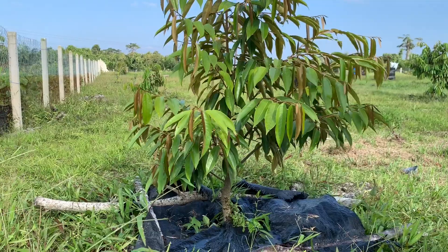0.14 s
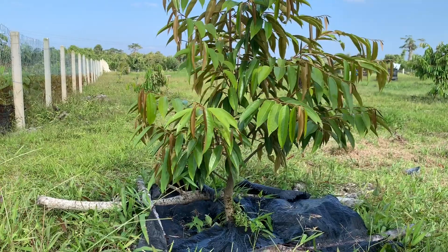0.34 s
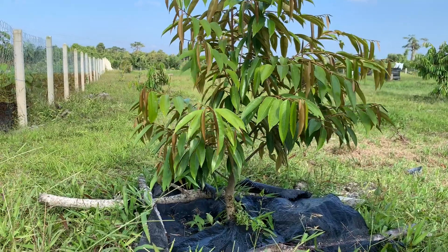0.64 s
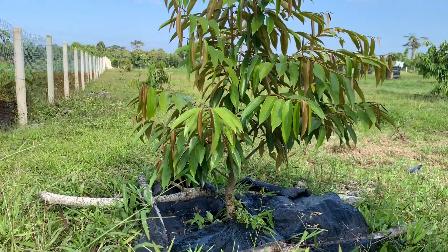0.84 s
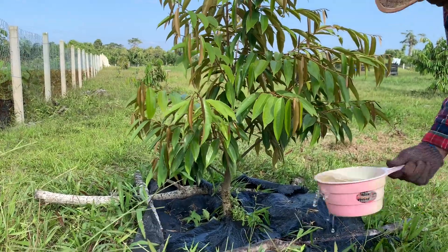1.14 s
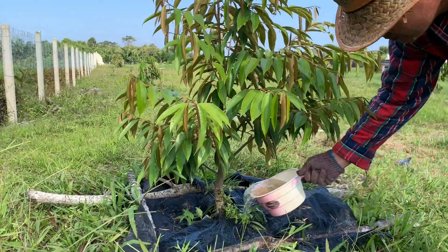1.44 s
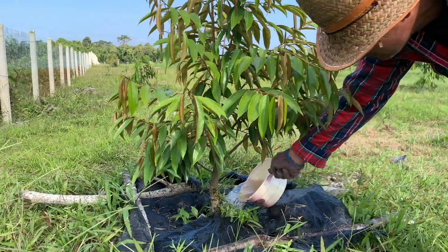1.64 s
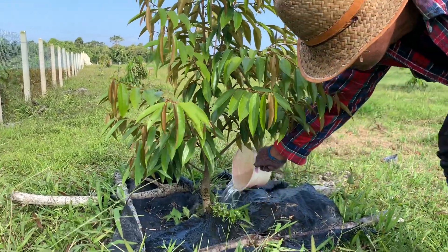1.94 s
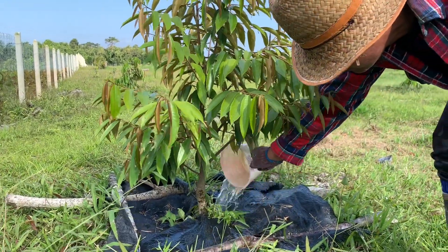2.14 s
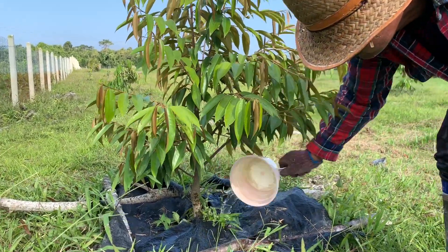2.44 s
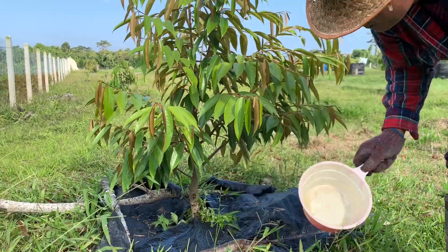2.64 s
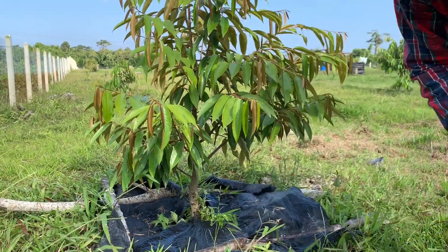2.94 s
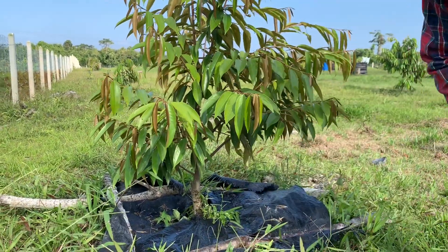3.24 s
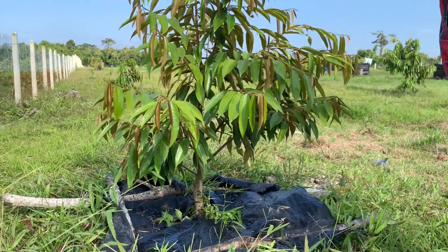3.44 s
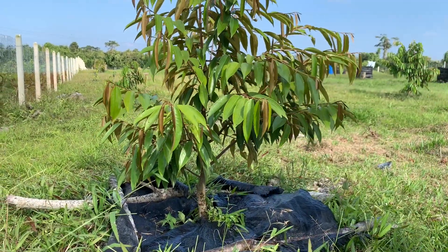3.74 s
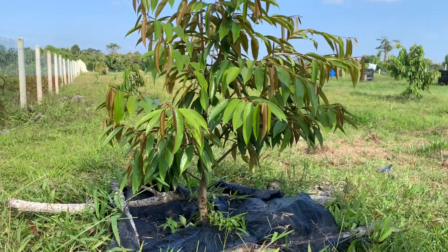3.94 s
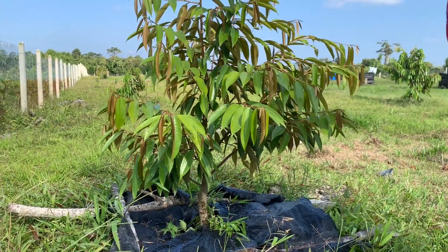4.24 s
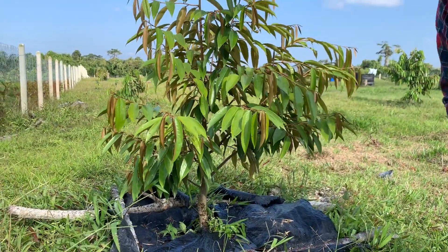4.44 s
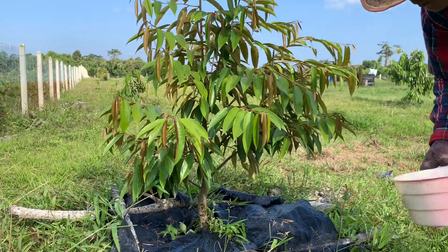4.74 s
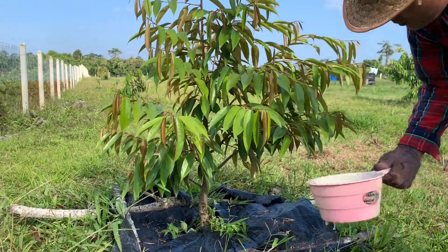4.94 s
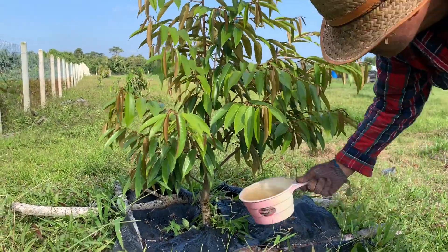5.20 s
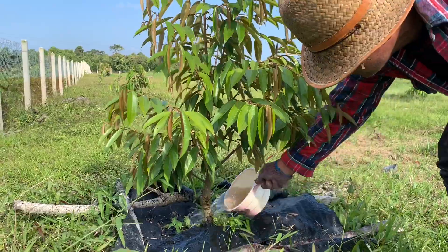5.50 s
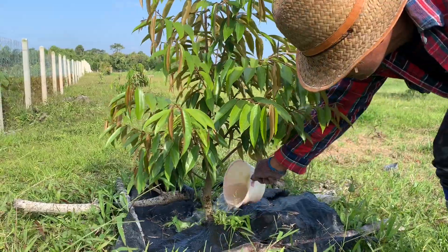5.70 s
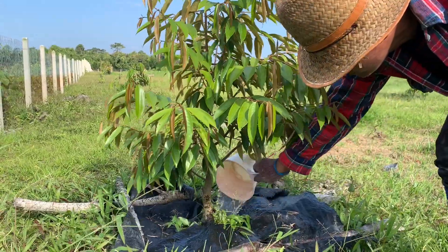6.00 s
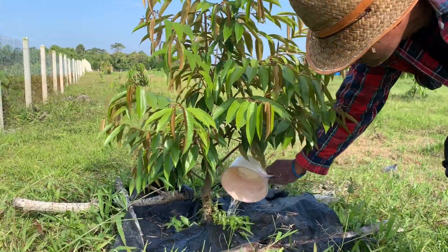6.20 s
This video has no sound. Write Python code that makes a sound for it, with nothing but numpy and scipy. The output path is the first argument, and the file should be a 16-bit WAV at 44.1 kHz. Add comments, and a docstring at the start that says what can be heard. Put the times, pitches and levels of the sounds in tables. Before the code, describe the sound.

In a breezy orchard, water slaps and gurgles hollowly in a bucket to the right as a dipper fills. A brief spill leads to a fizzing pour onto soil and netting close in front, while wind thumps the microphone. The dipper knocks sharply on the bucket, scoops more water with bubbly slosh, then pours a second time, unfinished at the end. Faint insects and leaves lie behind.

```python
"""An orchard in a light breeze: wind buffets the microphone ports, insects hiss and far leaves rustle.
To the right a plastic dipper is filled at a bucket, by coloured noise and short ringing tones; a far bird chirps.
From 1.2 s water spills and is poured in front onto netting and soil, as drop noise and bubbles.
Near 3 s the dipper knocks on the bucket, a sum of damped modes; it is filled again and, from 5.3 s, poured again."""
import sys
import numpy as np
from scipy import signal
from scipy.fft import rfft, irfft, next_fast_len
from scipy.io import wavfile
from scipy.ndimage import uniform_filter1d, map_coordinates

SR = 44100
rng = np.random.default_rng(int(sys.argv[2]) if len(sys.argv) > 2 else 0)


def bounce(signal):
    """Save signal as a 16-bit WAV file at the path given by the first command-line argument."""
    frames = np.transpose(np.atleast_2d(signal))
    limited = np.clip(frames, -1, 1)
    pcm = np.round(limited * 32767).astype(np.int16)
    wavfile.write(sys.argv[1], SR, pcm)


N = 280590
DIRECT = np.array([[1], [0]])  # sound with no scattered part
SIDE = np.array([[1], [-1]])  # left and right signs

# Spectrum of fine water spray. Each row: frequency in Hz, relative density in dB per Hz.
SPRAY = [(5000, 1), (7600, -38), (8200, 6), (10000, 8), (12500, 5.5), (15500, 6.5), (17000, -10)]


def amp(db):
    """Decibels to amplitude: 20 dB is a factor of ten."""
    return 10 ** (np.asarray(db) / 20)


def unit(x):
    """Normalise to a root mean square of 1."""
    return x / np.sqrt(np.mean(x ** 2) + 1e-20)


def along(points, hz):
    """Interpolate the columns of (Hz, value, ..) rows on a logarithmic frequency axis."""
    f, *cols = np.transpose(points)
    return np.squeeze([np.interp(np.log(hz + 1), np.log(f), c) for c in cols])


def gains(spans):
    """Envelopes linear in decibels, one for each level column; silent between the spans."""
    t, total = np.arange(N) / SR, 0
    for rows in spans:
        s, *cols = np.transpose(rows)
        edge = np.clip(np.minimum(t - s[0], s[-1] - t) / 0.016 + 1, 0, 1)  # 16 ms fades outside the span
        total = total + edge * amp([np.interp(t, s, c) for c in cols])
    return total


def wobble(rate):
    """Slow random modulation: a smooth curve through random knots, rate of them a second."""
    knots = rng.standard_normal(int(N * rate / SR) + 4)
    return map_coordinates(knots, [np.arange(N) * rate / SR])


def filtered(x, response):
    """Linear filtering: the spectrum of x times a complex response of frequency."""
    m = next_fast_len(N + 8192)
    return irfft(rfft(x, m) * response(np.fft.rfftfreq(m, 1 / SR)), m)[..., :N]


def rumble(spectrum):
    """Stationary coloured noise: two unrelated channels of rms 1."""
    def colour(hz):
        return amp(along(spectrum, hz) - 80 * (hz < spectrum[0][0]))
    return unit(filtered(rng.standard_normal((2, N)), colour))


def noise(spectrum, patchy_db):
    """Non-stationary coloured noise: two unrelated channels of rms 1 share patches of random gain."""
    hz, shape = np.fft.rfftfreq(512, 1 / SR), (257, N // 256 + 3)
    z = rng.standard_normal((2, *shape)) + 1j * rng.standard_normal((2, *shape))
    patches = uniform_filter1d(rng.standard_normal(shape), size=6, axis=0)
    patches = unit(uniform_filter1d(patches, size=2, axis=1))
    colour = along(spectrum, hz) - 80 * (hz < spectrum[0][0])
    cells = z * amp(colour[:, None] + patchy_db * patches)
    return unit(signal.istft(cells, nperseg=512)[1][:, :N])


def spatter(rate, spread_db, t60, smooth):
    """Shot-noise envelope: droplets land at random, few large and many small, over a smooth sheet."""
    sizes = amp(spread_db * np.minimum(rng.exponential(size=N), 3))
    hits = (rng.random(N) < rate / SR) * sizes
    swell = uniform_filter1d(hits, size=SR // 500)  # a droplet takes about 2 ms to spread
    decay = signal.lfilter([1], [1, -amp(-60 / SR / t60)], swell)
    return unit(smooth + unit(decay))


def bubbles(rate, low_hz, high_hz, cycles, spread_db, size, rise=0.02):
    """Resonance of air bubbles: soft-starting damped sines whose pitch rises a little."""
    draw = rng.random((int(rate * N / SR), 3))
    hz = low_hz * (high_hz / low_hz) ** draw[:, 1:2]
    k = np.arange(size)
    u = k / SR * hz / cycles
    strength = amp(-spread_db * np.log(draw[:, 2:] + 0.055))
    tone = np.sin(2 * np.pi * cycles * (u + rise * u * u))
    wave = strength * (1 - np.exp(-12 * u)) * np.exp(-4 * u) * tone
    at = (draw[:, :1] * N).astype(int) + k
    return unit(np.bincount(at.ravel(), wave.ravel(), N + size)[:N]) * DIRECT


def ticks():
    """Impulsive bursting of droplets: a few cycles each, scattered over the treble."""
    return 0.3 * bubbles(260, 2500, 14000, cycles=5, spread_db=7, size=90, rise=.1)


def bursts(events, t60, bright, body):
    """Impact noise: broad hiss over a lower body swells for a few ms to about the listed time, then decays."""
    top, low, t = np.zeros(N + SR), np.zeros(N + SR), np.arange(SR // 8) / SR
    shape = amp(-60 * t / t60) * (1 - np.exp(-t / .0016)) ** 2
    shape = shape / shape.max()
    for s, db, body_db in events:
        at = round((s - .002) * SR)
        top[at:][:len(t)] += amp(db - 9) * shape
        low[at:][:len(t)] += amp(body_db + db - 9) * shape
    return .5 * top[:N] * bright + .6 * low[:N] * body


def glides(rows, attack):
    """Frequency modulation: short tones swell, glide in pitch and fade; an early swell also glides early."""
    x = np.zeros(N)
    for s, db, first_hz, last_hz, length in rows:
        u = np.linspace(0, 1, round(length * SR)) ** attack
        phase = 2 * np.pi * np.cumsum(first_hz + (last_hz - first_hz) * u) / SR
        x[round(s * SR):][:len(u)] += amp(db) * np.sin(np.pi * u) * np.sin(phase)
    return x


def placed(x, where):
    """Interaural-style cues: direct and scattered rows reach two ports with set likeness, lag and level."""
    def turn(hz):
        return np.arccos(np.clip(along(where, hz)[1], 0, 1)) / 2

    def split(hz):
        return np.array([np.cos(turn(hz)), np.sin(turn(hz))])

    def ports(hz):
        lag, _, db = along(where, hz)
        return amp(SIDE * db / 2) * np.exp(-.5j * SIDE * lag)
    direct, scattered = filtered(x, split)
    return filtered(direct + SIDE * scattered, ports)  # the scattered part makes the ports less alike


def field():
    """Ambient noise: far leaves, a low rustle that comes and goes, and amplitude-modulated insects."""
    # Far leaves. Each row: frequency in Hz, relative density in dB per Hz.
    leaves = [(150, -83), (350, -95), (700, -100), (1400, -104), (2300, -109), (3400, -107), (5500, -112),
              (6600, -112), (7100, -105), (7600, -112), (9500, -113), (10300, -110), (11000, -115),
              (16000, -115)]
    # Band of the insects. Each row: frequency in Hz, relative density in dB per Hz.
    chorus = [(5900, -30), (6500, -7), (6850, 0), (7250, 0), (7600, -8), (8100, -40)]
    # Insects before their tremble. Each row: time in seconds, level in dB.
    insect_levels = [(0, -82), (1.2, -72.5), (2.7, -106), (3.5, -123), (5, -79), (6.36, -84)]
    # Low rustle before its wavering. Each row: time in seconds, level in dB.
    murmur_levels = [(0, -83), (1, -75), (2.5, -71.5), (3.3, -118), (4.7, -70), (5.3, -68), (6.36, -66)]
    tremble_db, pulses_per_s = 3.5, 65
    pulse = np.sin(2 * np.pi * pulses_per_s * np.arange(N) / SR + 2 * wobble(4))
    tremble = amp(tremble_db * (pulse + 0.61 * wobble(15)))
    insects = gains([insect_levels])[0] * tremble * rumble(chorus + [(8300, -120)])
    low_rustle = rumble([(200, -7.5), (400, -7.5), (700, -8), (1100, -19), (1600, -53)])
    murmur = gains([murmur_levels])[0] * amp(2.9 * wobble(23)) * low_rustle
    return amp(-64.0 + 0.51 * wobble(3.03)) * noise(leaves, patchy_db=3) + insects + murmur


def breeze():
    """Turbulent pressure: air eddies thump on the ports in lumps; the strongest are puffs of a few swings."""
    # Wind. Each row: time in seconds, relative strength in dB.
    strength = [(0.0, -69), (0.56, -50.5), (1.03, -53), (1.27, -42.5), (1.45, -35.5), (1.82, -53.5),
                (2.48, -52), (3.03, -49.5), (3.22, -46), (3.61, -57.5), (5.12, -50.5), (5.63, -56),
                (6.29, -52.5), (6.36, -79)]
    # Hard puffs on the ports. Each row: centre in seconds, relative peak in dB, pitch in Hz.
    puffs = [(1.018, -44, 51.3), (1.057, -37, 127), (1.075, -25, 63), (1.114, -33, 104),
             (1.161, -39.5, 61.4), (1.241, -28.5, 68.4), (1.288, -36, 128), (1.307, -30.5, 74.5),
             (1.396, -30.5, 119), (1.403, -23, 87), (1.455, -32, 123), (1.465, -36, 75.0), (1.543, -36, 73),
             (1.66, -45, 66), (1.658, -39, 142), (1.71, -47, 55), (1.889, -39.5, 69), (2.087, -42, 70.4),
             (2.144, -38.5, 55), (2.28, -42, 61), (2.476, -34, 59.5), (2.619, -35.5, 163),
             (2.765, -49, 150), (2.778, -34.5, 88.5), (2.9, -39.5, 110), (2.921, -39, 63),
             (2.997, -37.5, 74.0), (3.068, -35.5, 134), (3.091, -23.5, 167), (3.098, -24, 68.5),
             (3.112, -31.5, 227), (3.134, -34.5, 140), (3.215, -39, 149), (3.239, -38, 62.6),
             (3.295, -39, 68.4), (3.32, -38, 154), (3.365, -33, 74), (3.381, -32, 139), (3.384, -36, 242),
             (3.404, -29.5, 55), (3.663, -43, 181), (4.085, -43.5, 81.6), (4.569, -40.5, 179),
             (4.739, -41, 61.4), (4.915, -39.5, 75), (4.976, -42.5, 69.4), (5.137, -41, 63.0),
             (5.176, -41, 62), (5.23, -44, 66.6), (5.533, -42, 55.6), (6.051, -39.5, 56), (6.343, -38, 61)]
    # Deep thumping. Each row: frequency in Hz, relative density in dB per Hz.
    buffet_spectrum = [(15, -21), (32, 21), (55, 5.5), (78, 11.5), (110, 5), (160, -53)]
    # Higher flutter. Each row: frequency in Hz, relative density in dB per Hz.
    flutter_spectrum = [(70, -29), (120, 3.5), (200, -1), (320, -22), (600, -70)]
    flutter_db, flutter_grows = -62.5, 0.28  # mean level; share of the strength's swings
    puff_swings, puff_flutter_db = 1.13, -26.5  # half-width in cycles; each puff also shakes the flutter
    s, strength_db = np.transpose(strength)
    flutter_levels = flutter_db + flutter_grows * (strength_db - strength_db.mean())
    buffet, flutter = gains([np.transpose([s, strength_db, flutter_levels])])
    lumps = 3 * wobble(22)
    x = amp(3.0) * buffet * unit(amp(lumps) * rumble(buffet_spectrum))
    shake = rumble(flutter_spectrum)
    x = x + flutter * unit(amp(lumps + 2.2 * wobble(35)) * shake)
    t = np.arange(N) / SR
    phases = rng.uniform(0, 2 * np.pi, (len(puffs), 2, 1))  # unrelated at the two ports
    for (s, db, hz), phase in zip(puffs, phases):
        near = slice(max(round((s - .1) * SR), 0), round((s + .1) * SR))
        cycles = hz * (t[near] - s)
        swing = np.sin(2 * np.pi * cycles + phase) + amp(puff_flutter_db) * shake[:, near]
        x[:, near] += amp(db - 0.5) * np.exp(-(cycles / puff_swings) ** 2) * swing
    return x


def hollow(drive, centre_hz):
    """Cavity resonance: the air in the bucket rings; the water level picks which pitch speaks most."""
    # Resonances of the air. Each row: frequency in Hz, bandwidth in Hz.
    resonances = [(315, 8.3), (460, 110), (565, 69), (720, 190), (820, 240)]
    x = 0
    for hz, width_hz in resonances:
        ring = filtered(drive, lambda f: 1j * f * width_hz / (hz * hz - f * f + 1j * f * width_hz))
        x = x + unit(ring) * amp(-14 * np.abs(np.log2(centre_hz / hz)))
    return x / np.sqrt(uniform_filter1d(np.mean(x ** 2, axis=0), size=SR // 8) + 1e-9)  # even level


def filling():
    """Turbulent flow and cavity resonance: clumped spray, slosh and gurgle as water rushes into the dipper."""
    # Water moving in bucket and dipper. Each row: time in seconds, relative flow in dB, spray in dB over flow,
    # gurgle in dB over flow, hollow pitch in Hz.
    fill = [
        [(0.0, -67.5, -8, 7, 534), (0.12, -57, -1, 2, 730), (0.234, -62, -1.5, 8.5, 664),
         (0.294, -58.5, 6.5, 8, 402), (0.344, -61.5, -6, 3, 690), (0.474, -65, -5, 8, 520),
         (0.488, -50, -9, -12, 421), (0.512, -64, -1, 14, 334), (0.545, -56.5, 0, -1, 350),
         (0.565, -49.5, -4, -4, 378), (0.634, -66.5, -9, 16.5, 362), (0.658, -64.5, 2, 4, 397),
         (0.675, -58.5, 8, 6, 500), (0.722, -51, -3, -12, 645), (0.765, -48, -14, -13, 560),
         (0.79, -54, 1, -11, 520), (0.825, -48.5, -11, -6, 480), (0.854, -50, 3, -18, 435),
         (0.92, -79, -13, 10, 340)],
        [(2.99, -73, 1, 15, 390), (3.04, -67.5, 12, 6, 283), (3.09, -58.5, -3, -1, 264),
         (3.13, -68.5, 11, 26.5, 280), (3.16, -97, 0, -12, 300), (3.19, -111, 6, -16, 272),
         (3.24, -91, 27, -13, 270), (3.3, -106, -12, 0, 268)],
        [(3.41, -77, -2, 15, 430), (3.432, -58, 9, -2, 590), (3.556, -74, -8, 7, 490),
         (3.6, -67.5, 7, 6.5, 577)],
        [(3.63, -59, -3, 14.5, 437), (3.646, -48, 3.5, 6, 414), (3.694, -56.5, 4, 12, 430),
         (3.74, -64, -4, 10, 563), (3.892, -63.5, 4, -5, 725), (3.932, -50.5, -9, -2, 473),
         (4.004, -55, -4, 8.5, 646), (4.072, -55, 2, 4, 500), (4.114, -57.5, -5, 3, 535),
         (4.188, -60, -4, 3, 550), (4.205, -53.5, -3, 2.5, 556), (4.252, -52, -5, -2, 550),
         (4.28, -55.5, -3, 4.5, 394), (4.372, -57.5, -7.5, 1, 540), (4.44, -54, -5, 3.5, 486),
         (4.53, -57, -6, 0, 445), (4.584, -51, -3, 3, 410), (4.678, -50.5, -12, -15, 354),
         (4.73, -71.5, -13, 6.5, 427), (4.8, -71.5, -21, -10, 353)],
    ]
    # Slaps of water in the bucket. Each row: time in seconds, relative peak in dB, body in dB over peak.
    slaps = [(0.0288, -30.5, -17), (0.0917, -64, -9), (0.1216, -37, -18), (0.16, -35, 0), (0.2673, -38, -1),
             (0.3272, -47, -16), (0.3486, -29, -10), (0.391, -33, -28), (0.4274, -35, -29),
             (0.4499, -33.5, -26), (0.4863, -28, -29), (0.5526, -31.5, -19), (0.5851, -32, -14),
             (0.625, -36, -21), (0.6645, -34.5, -25), (0.6985, -31, -23), (0.7243, -30, -33),
             (0.736, -28, -29), (0.7544, -37, -21), (0.767, -40, 1), (0.822, -38, 9), (0.8344, -39, -13),
             (3.0333, -38.5, -25), (3.0607, -34.5, -27), (3.1794, -44.5, -13), (3.202, -50, -24),
             (3.2373, -56, -21), (3.4279, -46, -26), (3.468, -37.5, -1), (3.625, -49, 20.5),
             (3.7506, -35, -7), (3.8135, -42, -1.5), (3.8414, -30.5, -29), (3.9236, -48, -4),
             (3.9442, -27, -24), (3.9606, -29.5, -2), (3.9856, -30, 5.5), (4.0479, -36, -29),
             (4.0654, -28.5, -15), (4.134, -50, -22), (4.166, -48, -20), (4.1956, -32.5, -16),
             (4.2085, -31, -22), (4.2565, -24, -38), (4.2954, -29.5, -12), (4.4356, -27, -2),
             (4.472, -32, -17), (4.4919, -32.5, -2), (4.5603, -37, -11), (4.5852, -40, 1),
             (4.6431, -34, -5), (4.665, -50, 9), (4.6975, -32, -27), (4.7189, -34, -13)]
    # Coarse splash. Each row: frequency in Hz, relative density in dB per Hz.
    splash_spectrum = [(1500, -23), (2700, -0.5), (3600, -1), (4400, -2), (5300, -4.5), (6500, -1),
                       (7600, -4.5), (9000, -70)]
    # Slosh. Each row: frequency in Hz, relative density in dB per Hz.
    slosh_spectrum = [(500, -49), (950, 0), (1500, 3), (2400, 2.5), (3500, -22)]
    # Gurgle. Each row: frequency in Hz, relative density in dB per Hz.
    gurgle_spectrum = [(120, 6.5), (280, 0.5), (400, -6.5), (600, -3.5), (800, -1), (1300, -42)]
    slosh_depth = 0.48  # share of the gurgle's level over the flow that the slosh follows
    levels = [[(s, db, db + fine_db, db + slosh_depth * deep_db, db + deep_db)
               for s, db, fine_db, deep_db, _ in rows] for rows in fill]
    flow, spray, slosh, gurgle = gains(levels)
    churn = rumble(gurgle_spectrum)
    centre_hz = np.interp(np.arange(N) / SR, *np.concatenate(fill)[:, [0, -1]].T)
    drops = spatter(300, spread_db=3.5, t60=.045, smooth=.8)
    fine, coarse = noise(SPRAY, patchy_db=3), noise(splash_spectrum, patchy_db=3)
    wash = noise(slosh_spectrum, patchy_db=3)
    small = bubbles(230, 2720, 6040, cycles=22, rise=0.042, spread_db=3, size=220)
    medium = bubbles(180, 905, 3060, cycles=29, rise=0.38, spread_db=3, size=600)
    large = bubbles(90, 400, 970, cycles=16, rise=0.12, spread_db=3, size=1500)
    x = amp(1.5) * spray * drops * fine
    x = x + amp(2.0) * flow * unit(drops * coarse + ticks() + 0.5 * small)
    x = x + amp(4.0) * slosh * unit(drops * wash + 0.79 * medium)
    x = x + amp(1.0) * gurgle * unit(0.37 * churn + 0.97 * hollow(drops * churn, centre_hz) + 0.5 * large)
    return x + bursts(slaps, 0.024, fine + 0.8 * coarse, wash)


def gulps():
    """Resonance of large air pockets squeezed by moving water: gliding tones of wavering strength."""
    # Pockets. Each row: start in seconds, relative peak in dB, first and last pitch in Hz, length in seconds.
    pockets = [(0.02, -50, 715, 737, 0.044), (0.15, -47, 645, 768, 0.082), (0.225, -51, 743, 620, 0.092),
               (0.272, -47, 329, 315, 0.054), (0.346, -38.5, 534, 720, 0.017), (0.505, -45, 320, 325, 0.04),
               (0.555, -53, 333, 305, 0.056), (0.6, -49.5, 313, 338, 0.062), (0.74, -51, 830, 820, .05),
               (3.585, -54, 526, 517, 0.033), (3.635, -38, 346, 300, 0.022), (3.64, -38, 557, 494, 0.02),
               (3.64, -37, 730, 790, 0.029), (3.66, -35.5, 255, 341, .04), (3.677, -33, 397, 615, 0.022),
               (3.665, -42, 679, 646, 0.06), (3.81, -54, 747, 700, 0.059), (3.945, -40, 446, 594, 0.039),
               (3.982, -37, 715, 720, 0.027), (4.04, -45, 690, 784, 0.043), (4.05, -43, 302, 317, 0.02),
               (4.11, -48, 690, 604, .03), (4.185, -47, 517, 583, .035), (4.22, -43.5, 564, 746, 0.051),
               (4.225, -49.5, 320, 318, 0.047), (4.29, -52, 313, 285, .06), (4.315, -46, 820, 760, 0.021),
               (4.37, -50, 796, 825, 0.059), (4.43, -57, 540, 550, 0.11), (4.56, -46, 192, 205, 0.076),
               (4.58, -50, 1000, 1070, 0.029), (4.58, -47, 820, 810, 0.033)]
    return glides(pockets, attack=0.6) * amp(3 * wobble(110)) * DIRECT


def plops(events, t60):
    """Damped resonance: one short, slightly rising tone each; high ones die sooner (t60 in seconds at 1 kHz)."""
    high_die_faster = 0.93  # power of pitch that shortens the ring
    x, t = np.zeros(N + SR), np.arange(SR // 6) / SR
    for s, db, hz in events:
        ring_s = max(t60 * (1000 / hz) ** high_die_faster, .01)
        envelope = amp(db - 4.5 - 60 * t / ring_s) * (1 - np.exp(-t / 0.0015))
        x[round(s * SR):][:len(t)] += envelope * np.sin(2 * np.pi * hz * (.985 * t + 0.28 * t * t))
    return x[:N] * DIRECT


def bird():
    """Gliding tones under random modulation: short faint whistles, roughened by leaves and distance."""
    # Far chirps. Each row: start in seconds, relative peak in dB, first and last pitch in Hz, length in seconds.
    chirps = [(0.91, -69, 2330, 1980, 0.032), (1.05, -73, 4340, 4050, .025),
              (1.068, -68, 2480, 2410, 0.016), (1.075, -66, 2120, 1960, 0.036),
              (5.168, -71, 3720, 4300, .028)]
    return glides(chirps, attack=1) * wobble(450) * DIRECT


def pouring():
    """Stream breakup: dense drops fizz in the soil, with a higher and a deeper puddle patter at own levels."""
    # A first spill and two pours. Each row: time in seconds, relative levels in dB of the flow,
    # the puddle patter and the deep patter.
    pours = [
        [(1.22, -82, -94, -90), (1.232, -86, -76, -71), (1.268, -76, -68, -71), (1.286, -57, -73, -69),
         (1.296, -55, -63, -66), (1.308, -55, -76, -60), (1.328, -77, -76, -81), (1.342, -78, -91, -91),
         (1.36, -78, -94, -90)],
        [(1.43, -69, -69, -80), (1.472, -57, -62, -73), (1.482, -51, -55.5, -61), (1.552, -51.5, -59.5, -68.5),
         (1.616, -51, -51, -58), (1.82, -53.5, -50, -57), (1.842, -60, -55, -56.5), (2.144, -55.5, -59, -62),
         (2.356, -53, -52, -59.5), (2.522, -63, -69, -81), (2.59, -57.5, -73, -91), (2.608, -67, -68, -75),
         (2.72, -86, -83, -85)],
        [(5.35, -72, -75, -81), (5.416, -56, -69, -79), (5.444, -50.5, -55, -71), (5.496, -54.5, -61, -69),
         (5.52, -52, -56, -62), (5.74, -55, -52.5, -53.5), (6.08, -58.5, -58, -60.5), (6.118, -55.5, -54, -59),
         (6.148, -59.5, -55, -68), (6.162, -54, -53, -67), (6.17, -56, -54, -66), (6.314, -65, -73, -76),
         (6.36, -65, -70, -76)],
    ]
    # Single drops on the netting. Each row: time in seconds, relative peak in dB, body in dB over peak.
    single_drops = [(1.2349, -40.5, -16), (1.249, -50, -25), (1.261, -42, -13), (1.27, -40, -25),
                    (1.2863, -22, -40), (1.299, -26, -29), (1.3776, -35, -31), (1.396, -43, -23),
                    (1.411, -30, -25), (1.4414, -34.5, -10.5), (1.4539, -37, -22), (1.4838, -36, -10.5),
                    (1.67, -33, -9), (1.749, -27, -20), (1.7597, -28.5, -29), (1.81, -41, -14),
                    (1.9932, -27, -29), (2.0825, -35, -14), (2.2735, -31, -22), (2.3977, -33, -20),
                    (2.4571, -28, -21), (2.492, -47, -6), (2.512, -26, -20), (2.5604, -28.5, -17),
                    (2.606, -27.5, -21), (2.6432, -37.5, -18), (4.7844, -57, -22), (4.934, -39, -24.5),
                    (5.07, -48, -24), (5.196, -42.5, -9.5), (5.3216, -40, -31), (5.338, -40, -35),
                    (5.395, -44, -15), (5.4224, -32, -35), (5.4588, -28.5, -18), (5.634, -52, -29),
                    (5.673, -54, -12), (5.708, -52, -12), (5.8474, -33, -4.5), (5.883, -36.5, -28),
                    (6.0959, -42, 1), (6.1597, -34, -18)]
    # Fizz in the soil. Each row: frequency in Hz, relative density in dB per Hz.
    fizz_spectrum = [(1800, -30), (2600, -8.5), (3100, -0.5), (4200, 0), (5000, -5), (6500, 0.5),
                     (7600, -2.5), (9000, -82)]
    # Higher puddle patter. Each row: frequency in Hz, relative density in dB per Hz.
    patter_spectrum = [(900, -28), (1300, -3), (1550, 3.5), (1800, -1.5), (2250, -4), (2600, -2),
                       (3200, -32)]
    # Deeper puddle patter. Each row: frequency in Hz, relative density in dB per Hz.
    deep_spectrum = [(450, -11), (750, -11.5), (900, -9), (1200, 4.5), (1400, -6), (1800, -31)]
    thin_db_per_s = 6  # the fine spray fades as the ground gets wet
    levels = [[(s, db - thin_db_per_s * (s - rows[0][0]), db, *wet_db) for s, db, *wet_db in rows]
              for rows in pours]
    spray, splash, patter, deep = gains(levels)
    drops = spatter(450, spread_db=3.5, t60=.07, smooth=.9)
    fine, coarse = noise(SPRAY, patchy_db=0), noise(fizz_spectrum, patchy_db=3)
    body, low = noise(patter_spectrum, patchy_db=0.5), noise(deep_spectrum, patchy_db=1)
    small = bubbles(400, 2650, 5000, cycles=16, spread_db=3, size=300, rise=0.2)
    medium = bubbles(400, 1300, 2200, cycles=16, spread_db=3, size=500, rise=.12)
    large = bubbles(200, 830, 1250, cycles=14, spread_db=3, size=700, rise=.12)
    x = amp(6.5) * spray * drops * fine
    x = x + amp(1.06) * splash * unit(drops * coarse + ticks() + 0.54 * small)
    x = x + amp(-0.7) * patter * unit(drops * body + .9 * medium)
    x = x + amp(-0.7) * deep * unit(drops * low + .9 * large)
    return x + bursts(single_drops, 0.013, fine + 0.5 * coarse, body + low)


def knocks():
    """Modal synthesis: each blow rings the plastic at new strengths over a dry clack; hard contact cracks."""
    # Dipper against bucket. Each row: time in seconds, relative peak in dB, crack in dB over peak,
    # favoured pitch in Hz, clack in dB over peak.
    blows = [(2.8759, -18.5, 0, 1510, 0.5), (2.8995, -37, -29, 1490, 0), (2.912, -42, -25, 1490, 0),
             (2.97, -19.5, -2.5, 1430, -1.5), (2.984, -29.5, -29, 895, -6), (2.993, -49, -30, 1900, -4),
             (3.021, -36, -14, 990, -6), (3.121, -31.5, -24, 730, 1), (3.358, -19.5, -36, 650, -17.5)]
    # Modes of the plastic. Each row: frequency in Hz, relative level in dB, t60 in seconds before water damping.
    modes = [(560, -2, 0.027), (657, 6.5, 0.053), (847, 4, 0.07), (1100, 9.5, 0.039), (1250, -2, 0.15),
             (1470, 20, 0.023), (1900, 9, 0.047), (2140, 2, 0.078), (2920, -13, 0.079), (3900, -21, 0.036)]
    # Bucket wall giving way. Each row: frequency in Hz, relative density in dB per Hz.
    thud_spectrum = [(110, -21), (180, 9), (320, 4.5), (550, 7), (900, -57)]
    # Dry clack. Each row: frequency in Hz, relative density in dB per Hz.
    clack_spectrum = [(250, -12), (600, -18), (1400, -1), (2400, 0), (3600, -18), (5000, -55)]
    # Crack of hard contact. Each row: frequency in Hz, relative density in dB per Hz.
    crack_spectrum = [(2500, -50), (3800, 4), (6500, 2), (10000, 5), (16500, -1)]
    tap_t60_s, hard_t60_s = 0.019, 0.029  # clack of a light and of a hard blow
    thud_db, thud_t60_s = -16, 0.08
    x, thud, clack, crack = np.zeros((4, N + SR))
    t = np.arange(SR // 5) / SR
    rise = (1 - np.exp(-t / .0012)) ** 2
    for s, db, crack_db, centre_hz, clack_db in blows:
        at = slice(round(s * SR), round(s * SR) + len(t))
        ring = 0
        for hz, level, t60 in modes:
            mode_db = level - 9.8 * abs(np.log2(hz / centre_hz)) + rng.normal(0, 1.5)
            damped_s = t60 * min(700 / hz, .9)  # water inside damps the higher modes faster
            ring = ring + amp(mode_db - 60 * t / damped_s) * np.sin(2 * np.pi * hz * t)
        x[at] += amp(db - 3.0) * rise * ring / np.abs(rise * ring).max()
        clack_s = hard_t60_s if db > -30 else tap_t60_s
        clack[at] += amp(db + clack_db) * rise * (amp(-60 * t / clack_s) + 0.042 * amp(-60 * t / 0.22))
        thud[at] += amp(db + thud_db - 60 * t / thud_t60_s) * rise
        crack[at] += amp(db + crack_db) * rise * (amp(-60 * t / 0.015) + 0.015 * amp(-60 * t / 0.29))
    contact = clack[:N] * noise(clack_spectrum, patchy_db=0)
    contact = contact + 1.13 * crack[:N] * noise(crack_spectrum, patchy_db=0)
    return x[:N] * DIRECT + thud[:N] * rumble(thud_spectrum) + contact


def scene():
    """Superposition: the surroundings, the bucket to the right and the pours in front add up."""
    # Surroundings. Each row: frequency in Hz, left lag in radians, likeness 0-1, left over right in dB.
    around = [(38.2, -0.15, 0.84, 2), (116, -0.9, 0.78, -0.5), (287, 0.7, 0.66, -1), (910, -1.8, 0.62, 1.5),
              (1590, 1, 0.06, -0.5), (3320, -1.5, 0.55, 0.5), (4900, 11, 0.15, -5), (7940, 9, 0.15, 6)]
    # Bucket. Each row: frequency in Hz, left lag in radians, likeness 0-1, left over right in dB.
    right = [(59.7, -2, 0.6, 4), (280, 0.75, 1, 0.5), (736, 2, 0.78, -5.5), (1400, 2, 0.5, -2.5),
             (2730, 3.5, 0.76, -0.5), (3600, 4.5, 0.25, -2), (5340, 8.5, 1, -5.5), (7200, 7, 0, 4.5)]
    # Pours. Each row: frequency in Hz, left lag in radians, likeness 0-1, left over right in dB.
    front = [(300, -0.14, 0.24, 0.5), (1420, 0.3, 1, -1), (2980, -1.76, 0.74, 2.5), (3020, -0.68, 0.57, 0),
             (5470, -1.6, 0.91, -4), (8150, 1, 0.026, 3)]
    # Short ringing tones in the bucket: bubbles closing and the bright ring of water slaps.
    # Each row: time in seconds, relative peak in dB, pitch in Hz.
    bucket_tones = [(0.026, -30.5, 570), (0.0268, -32, 1490), (0.121, -34, 775), (0.174, -31.5, 737),
                    (0.206, -37, 490), (0.263, -29, 687), (0.2663, -27, 1510), (0.351, -25, 705),
                    (0.4763, -30.5, 1400), (0.49, -35, 750), (0.586, -35, 550), (0.6225, -27.5, 1010),
                    (0.268, -23.5, 3580), (0.3486, -23, 6050), (0.4274, -37, 3630), (0.45, -25, 5960),
                    (0.4863, -13, 6500), (0.552, -40, 4410), (0.6654, -28, 4000), (0.7243, -24, 5800),
                    (0.735, -33, 3960), (0.806, -40, 4700), (0.822, -21, 4000), (3.6437, -20.5, 3700),
                    (3.7505, -29.5, 4460), (3.82, -32, 2270), (3.868, -27.5, 4160), (3.985, -26, 3700),
                    (4.166, -27, 3950), (4.2563, -14, 5160), (4.3576, -32, 4460), (4.4364, -24, 4330),
                    (4.56, -22, 4520), (4.5856, -21.5, 4460), (4.6435, -23.5, 4100), (4.664, -28, 3300),
                    (4.675, -24, 4470), (0.6998, -34, 1290), (0.7542, -33.5, 1010), (0.8265, -26.5, 1290),
                    (0.8979, -40, 1090), (3.6313, -24, 1400), (3.897, -37, 735), (3.9236, -21, 1610),
                    (3.9596, -24, 2360), (3.9875, -20, 1800), (3.99, -26, 564), (4.0918, -29, 1195),
                    (4.132, -33.5, 544), (4.1945, -35, 1080), (4.375, -34, 856), (4.4365, -35, 1080),
                    (4.4659, -26.5, 1320), (4.466, -32, 830), (4.4928, -27.5, 1315), (4.564, -37, 350),
                    (4.5652, -24.5, 1053), (4.6071, -15.5, 2040), (4.6709, -25, 1366)]
    # Single bubbles in the puddle on the soil. Each row: time in seconds, relative peak in dB, pitch in Hz.
    puddle_bubbles = [(1.261, -42.5, 880), (1.484, -33, 1680), (1.626, -30, 1540), (1.696, -34, 1480),
                      (1.727, -24.5, 1510), (1.75, -28, 1670), (1.787, -33, 1470), (1.643, -29, 1550),
                      (1.795, -31, 1130), (1.81, -35, 1006), (1.873, -43, 1040), (1.486, -33, 3130),
                      (1.62, -43, 3580), (1.931, -35, 1540), (2.029, -54, 1650), (2.055, -34, 3100),
                      (2.129, -31, 3520), (2.188, -29, 3700), (2.214, -46, 1620), (2.563, -46, 3390),
                      (2.077, -39, 890), (2.284, -42, 1170), (2.338, -37, 1150), (2.397, -28, 2160),
                      (4.784, -38, 4250), (5.322, -30.5, 5140), (5.424, -28, 4500), (5.549, -32, 1830),
                      (5.633, -26, 4400), (5.64, -38, 1710), (5.704, -45, 1630), (5.824, -27, 4000),
                      (5.848, -24.5, 3260), (5.883, -28, 4100), (5.925, -29, 3250), (6.023, -33, 1690),
                      (6.1, -34, 1210), (6.16, -21.5, 3130), (5.621, -41, 1010), (5.673, -34, 1080),
                      (5.73, -32.5, 985), (5.755, -31, 920), (5.827, -41, 1260), (5.848, -50, 1300),
                      (5.903, -39, 1440), (5.967, -26, 2700), (5.982, -25.5, 3300), (6.152, -38, 1640)]
    # The soft weave dulls the stream's top. Each row: frequency in Hz, gain in dB.
    netting = [(8500, -1), (12000, -6.5), (16000, -11.5)]
    surroundings = field() + breeze() + bird()
    bucket = filling() + gulps() + plops(bucket_tones, t60=0.047) + knocks()
    stream = filtered(pouring(), lambda hz: amp(along(netting, hz)))
    ground = stream + plops(puddle_bubbles, t60=0.029)
    return placed(surroundings, around) + placed(bucket, right) + placed(ground, front)


def record(dry):
    """Band limiting and port mixing: both trebles come mostly from the right port, with a set phase lag."""
    split_hz, top_hz = 7500, 16855

    def treble(hz):
        lag = np.pi + 2 * np.pi * (hz - 8580) / 4900  # of the left, in radians
        return (hz >= split_hz) * 1.565 * np.exp(-.5j * SIDE * lag)

    def band(hz):
        bass_cut = 1 / np.sqrt(1 + (46 / (hz + 1)) ** 8)
        return amp(-34 * (hz > 15900)) * bass_cut * (hz < top_hz)
    own = filtered(dry, lambda hz: np.where(hz < split_hz, 1, .35))
    shared = filtered(dry[1], treble)
    return filtered(own + shared, band)


dry = scene()
out = record(dry)
bounce(out)
```